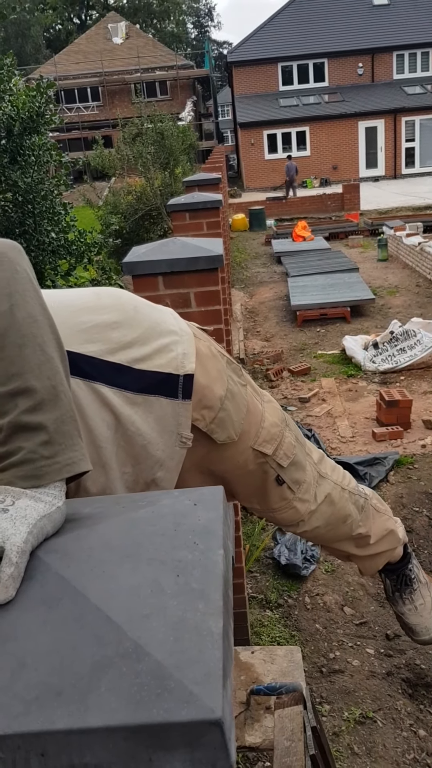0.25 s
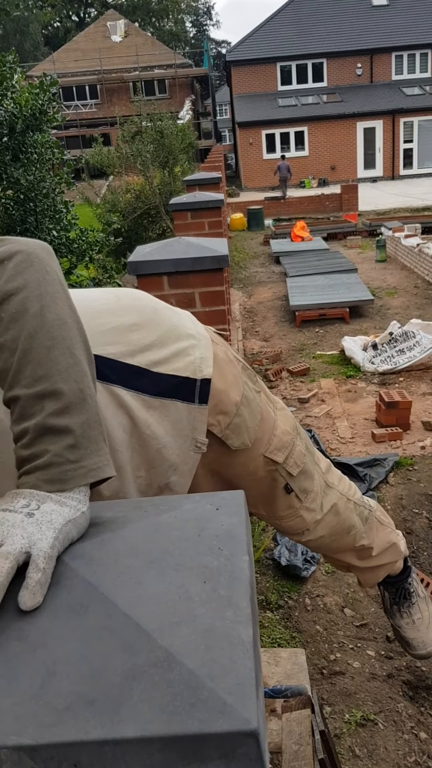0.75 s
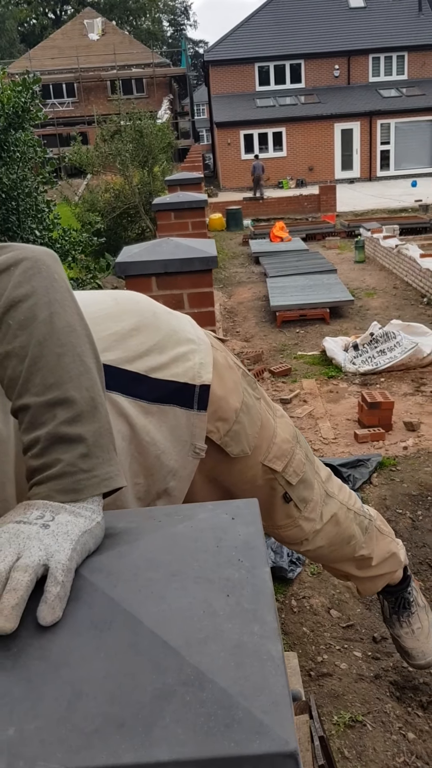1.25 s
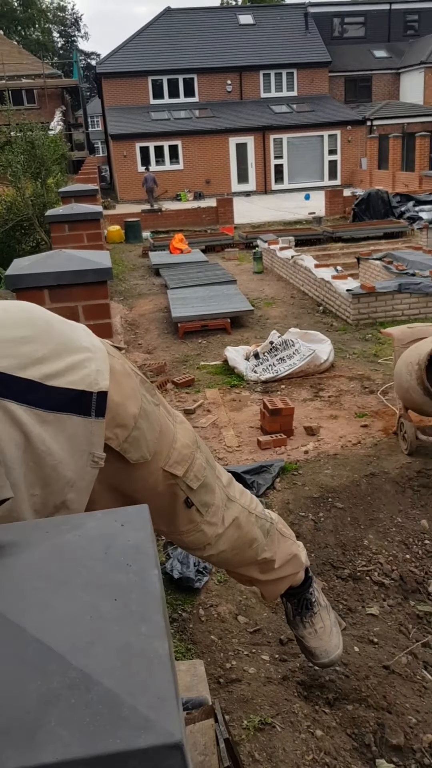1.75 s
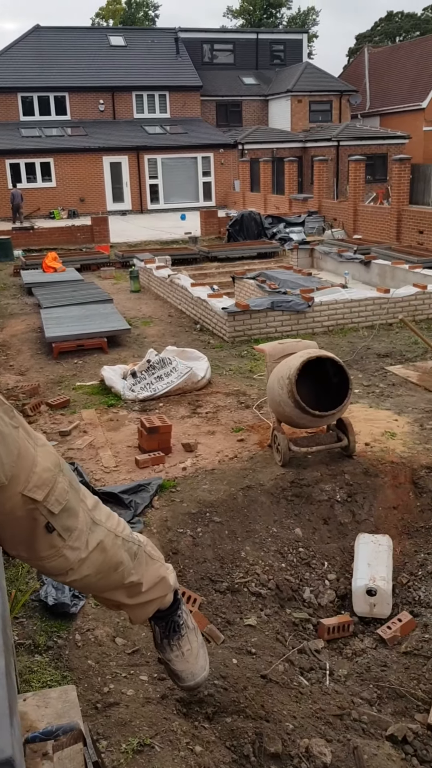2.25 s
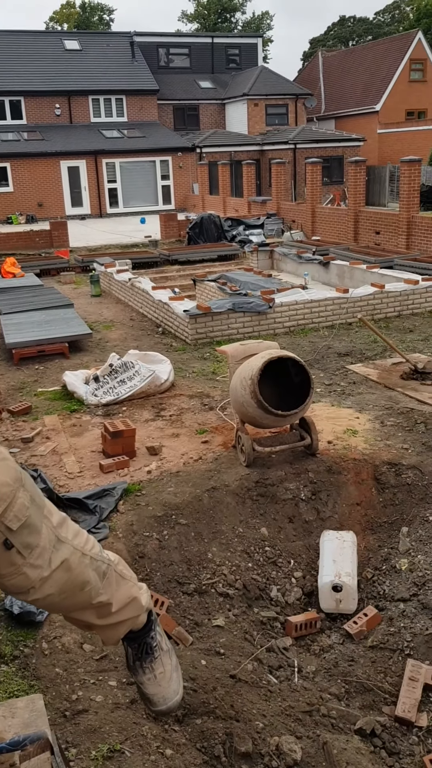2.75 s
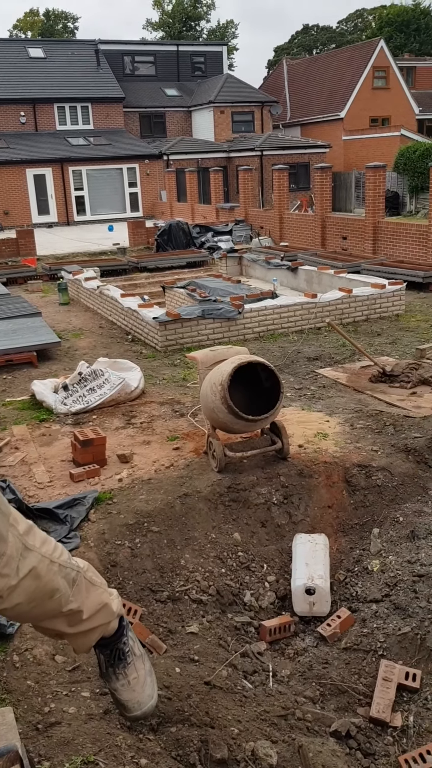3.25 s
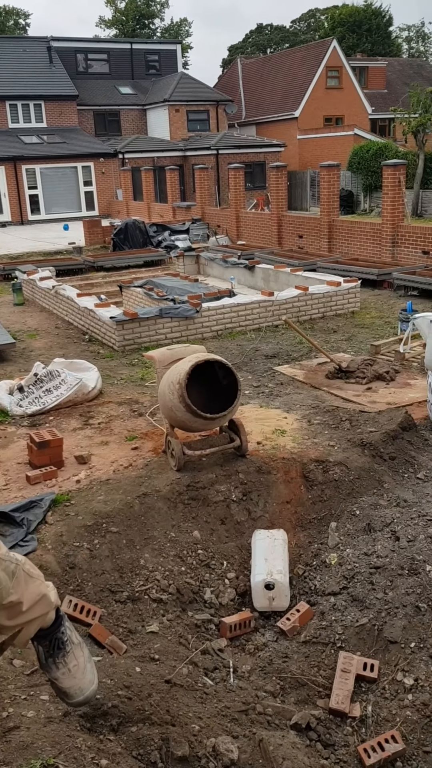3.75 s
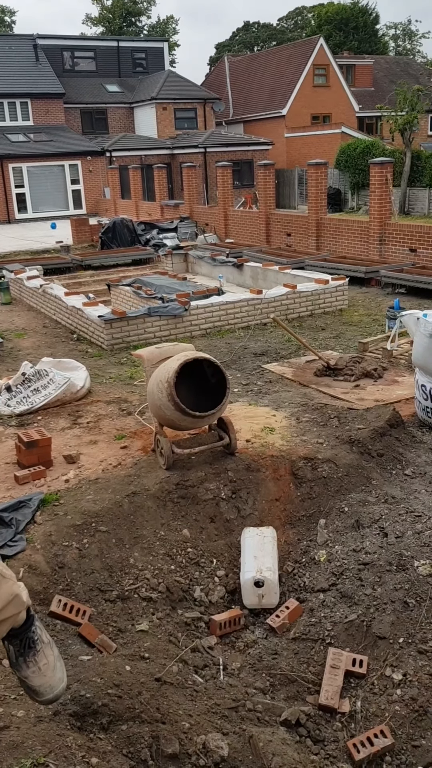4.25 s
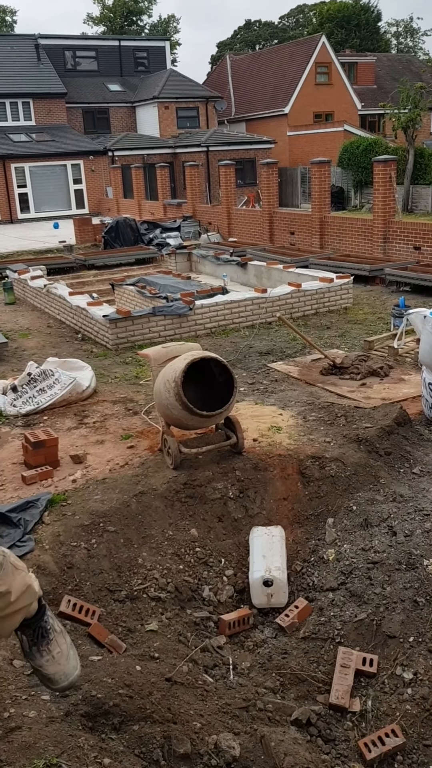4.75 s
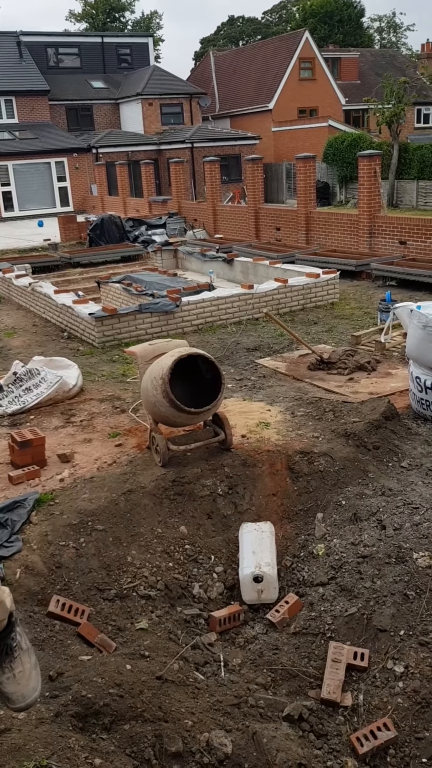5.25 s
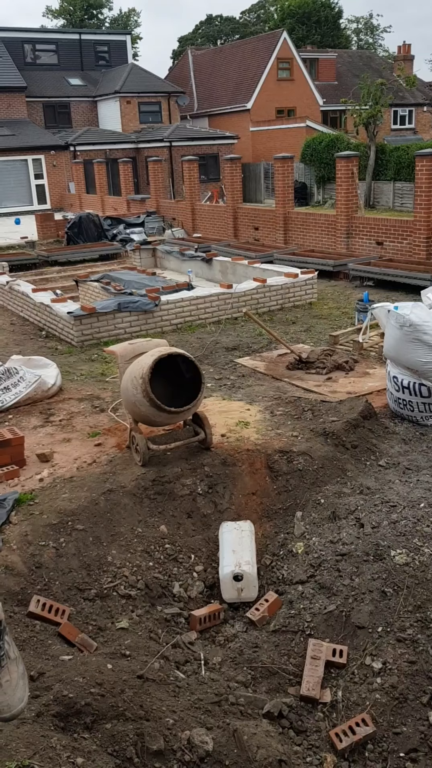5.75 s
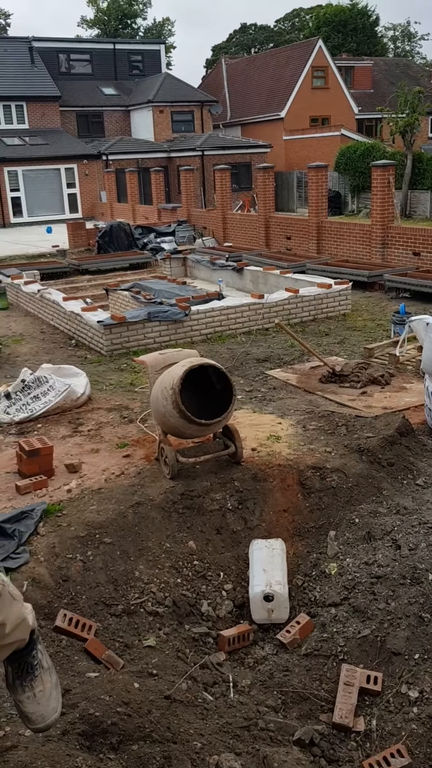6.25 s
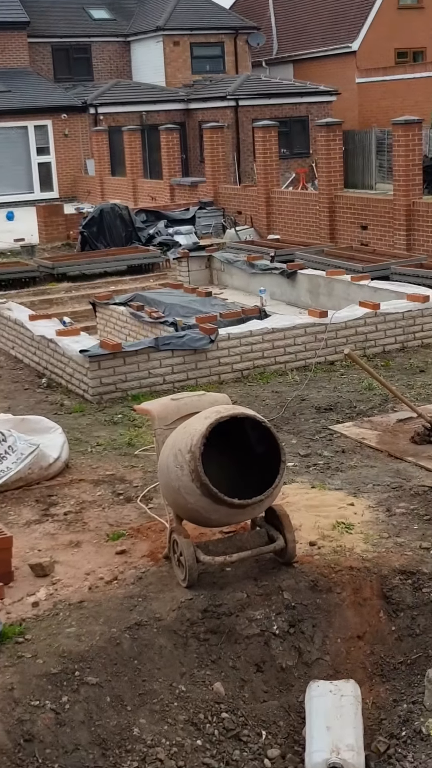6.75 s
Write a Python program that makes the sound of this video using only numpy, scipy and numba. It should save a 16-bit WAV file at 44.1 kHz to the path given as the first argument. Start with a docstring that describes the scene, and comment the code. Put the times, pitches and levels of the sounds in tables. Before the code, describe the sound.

Gritty scrapes and sharp ticks of steel dragging over brick and concrete, with dull mortar thuds, over faint traffic and light wind.

```python
"""Trowel at work under a pillar cap

A bricklayer works mortar close by: a steel trowel drags over brick and concrete. Random grain cracks drive
the sliding contact, the ringing blade and the masonry; ticks, squeaks and a soft rub are added on top.
Wet mortar gives soft thuds of filtered noise, with a few low bumps. Behind lie shaped noise for distant
traffic, leaves, a fading drone and light wind on the microphone, and a few thin gliding bird whistles.
"""
import sys
import numpy as np
from scipy import signal
from scipy.fft import rfft, irfft
from scipy.io import wavfile
from scipy.ndimage import uniform_filter1d
from numba import njit

SR = 44100
rng = np.random.default_rng(int(sys.argv[2]) if len(sys.argv) > 2 else 0)


def put_to_file(sound):
    """Save the sound as 16-bit audio at rate SR, in the file named by the first command-line argument."""
    columns = np.atleast_2d(sound).T  # one column per channel
    safe = np.clip(columns, -1, 1)
    whole_steps = np.round(safe * 32767)
    wavfile.write(sys.argv[1], SR, whole_steps.astype(np.int16))


N = 309141
TIME = np.arange(N) / SR
FREQ = np.maximum(np.arange(N // 2 + 1) * SR / N, 1)

# Decays, fades and creep-ins are exponential time constants; colours are relative levels.
# colour of the far traffic: f/Hz, level/dB
TRAFFIC = [(59, -44), (100, 11.5), (118, 4.5), (214, -6), (313, -3.5), (395, -9.5), (468, -13),
           (1160, -19.5), (1590, -25.5), (2330, -35.5), (3000, -32.5), (3710, -36), (4390, -30),
           (6290, -42.5), (15600, -40.5)]
# level of the far traffic: t/s, level/dB
TRAFFIC_LEVEL = [(0.3, -55.5), (1.6, -58.5), (4.1, -60), (5.6, -62.5), (6.3, -56.5)]
RUMBLE_DB, LEAVES_DB = 3, -72.5  # the low rumble is relative to the traffic
# for a while the low end drops away, then creeps back
LULL_START_S, LULL_END_S, LULL_FALL_S, LULL_RETURN_S = 4.65, 6, 0.14, 0.4
LULL_WIND_DB, LULL_RUMBLE_DB = -15, -12
# colour of the wind on the microphone, ahead of its low and high cuts: f/Hz, level/dB
WIND = [(12, -29), (20, 1), (35, 1), (52, 7.5), (72, -3.5), (112, 1.5), (173, -20.5), (220, -10.5),
        (290, -4), (480, -120)]
# gusts on the microphone: start/s, length/s, level/dB
GUSTS = [(4.18, 0.43, -44.5), (6.355, 0.16, -46), (6.563, 0.052, -41.5), (6.66, 0.4, -48)]
BREEZE_DB = -56
# a far drone holds, then fades to a remnant
DRONE_DB, DRONE_HOLD_S, DRONE_FADE_S, DRONE_REST_DB = -57.5, 0.62, 0.3, -72
# lone grains that snap or drop: t/s, level/dB, f/Hz, width/Hz of each of two equal resonances in a row
TICKS = [(0.271, -54, 5900, 6000), (0.576, -33, 2070, 1590), (0.581, -37, 2090, 1400),
         (0.922, -30, 4200, 7000), (1.19, -52, 8000, 10000), (1.295, -54, 2600, 3000),
         (1.41, -55.5, 5400, 1200), (1.65, -58, 4180, 4000), (2.133, -24, 4300, 1400),
         (2.137, -30, 4400, 1400), (3.831, -46.5, 3200, 1800)]
TICK_DECAY_S = 0.0014
# pushes of the trowel: start/s, length/s, rasp level midway/dB, swell from start to end/dB, creep-in/s,
# then relative to the rasp: blade ring/dB (ahead of the ring lift), sand hiss/dB, masonry/dB,
# contact resonance/dB
STROKES = [(0.587, 0.057, -55.5, 9, .003, -1, -12, 0, -3), (0.636, 0.067, -44, 4.5, .007, -8, -7.5, -7, 7),
           (0.765, 0.081, -48, 5.5, 0.024, -9, -2, -11, 5),
           (0.91, 0.13, -51.5, -9.5, 0.026, -5.5, 0.5, -11, -22),
           (1.886, 0.23, -44, 11.5, 0.021, -7, -4.5, -18.5, 9.5),
           (2.141, 0.12, -42.5, -6.5, 0.014, -1.5, -3.5, -22, -4),
           (2.835, 0.15, -63, -10, 0.011, -20, -4, -3, -3),
           (3.176, 0.17, -60, -7, .002, 1.5, -6.5, 2.5, -12),
           (3.323, 0.14, -69, -14, 0.0054, -16, 5, -3, -7),
           (4.577, 0.074, -51.5, 0, 0.003, -13, -8.5, -8, -12),
           (4.653, 0.13, -73.5, -5, .006, 10, -1, -3, -10),
           (4.81, 0.11, -56, -5.5, 0.0073, -10, -4.5, -1, -17),
           (5.873, 0.089, -53, 8, 0.028, -5, -6.5, -1.5, -10),
           (5.981, 0.0099, -48, -1, .003, -16, -7.5, 0, 1),
           (6.197, 0.082, -61.5, 7.5, 0.021, -18, -7.5, 2.5, 0),
           (6.36, 0.043, -50, 11, 0.029, -0.5, -10, -10, 9),
           (6.428, 0.071, -45.5, 1, 0.0039, -13, -4.5, -13, -8),
           (6.506, 0.13, -47.5, -0.5, 0.016, -4, -4.5, -7.5, 3),
           (6.627, 0.043, -42, -1, 0.0059, -14, -7, -5, 4),
           (6.701, 0.07, -42.5, -6, 0.0097, -13, -2.5, -5, 7.5)]
LIFT_S = 0.019  # the blade lets go
DUST_DB, DUST_S = -16.5, 0.14  # loosened sand runs on after a push
STICK_DB, CHATTER_DB = 1.1, 0.5  # slow and fast unevenness of the drag
# the blade catches or taps, ahead of the trims and ring lift in trowel(): t/s, rasp level/dB,
# then relative to the rasp: blade ring/dB, sand hiss/dB; decay/s
CATCHES = [(0.623, -38.5, -7, -26, .005), (0.639, -35, -13, -13, .005), (0.661, -39, -12, -8, 0.0055),
           (0.695, -39.5, -3, 7.5, 0.0057), (0.704, -56, 16, 4, .012), (0.725, -48, 7.5, 3, .007),
           (0.928, -49, 3, -7, 0.0046), (0.958, -56, 7, -7, 0.0044), (1.826, -36.5, -29, 0.5, 0.01),
           (2.132, -42.5, 11, -11, 0.0054), (2.15, -47, 8, -9, 0.0046), (2.169, -44, 17, -12, 0.0065),
           (2.19, -39, 7, 0, 0.0079), (2.229, -40, 9, 6, 0.0049), (2.804, -45.5, -26, -8, 0.0083),
           (2.901, -48.5, -21, 1, .004), (3.183, -55, 7, -10, .006), (3.313, -41.5, -3.5, -19, 0.007),
           (3.333, -44.5, -24, 2.5, 0.0092), (3.83, -54.5, -26, -2, 0.032), (3.978, -59, -24, 1.5, 0.03),
           (4.569, -46.5, -16, -11, 0.0041), (4.745, -47, -1, -21, .005), (4.8, -51, 5, -1, .006),
           (4.828, -49, 17, -17, 0.008), (4.837, -50.5, 13, -16, 0.0051), (4.865, -39, 8, -17, 0.0034),
           (4.891, -41.5, -5, -21, .007), (5.317, -50, -10, 0, 0.014), (5.94, -36, -7, -5, 0.0041),
           (5.983, -37, -3, -18, 0.0044), (6.275, -46, -6.5, -11, 0.0096), (6.391, -33.5, -8, -22, 0.009),
           (6.431, -30.5, -15, -14, 0.0085), (6.625, -31.5, -14, -12, 0.0036),
           (6.683, -34, -8.5, 3, 0.0059), (6.708, -32, -4.5, 3, 0.0092), (6.736, -30.5, -14, 5, 0.0058),
           (6.76, -24.5, -21, -3, 0.0059), (6.766, -33, -14, 0, 0.0027), (6.788, -29, -22, 8, 0.0031)]
# colour of the rasp: f/Hz, left level/dB, right level/dB
RASP = [(300, -12, -13), (780, -11, -13), (1450, -6.5, -11), (1970, 0.5, -0.5), (2300, 1, -0.5),
        (3300, 2.5, -2.5), (3850, 1.5, 1), (4870, -6, -0.5), (5880, -6.5, -1), (6870, -10, -39),
        (7580, -8.5, -24), (7660, -32, -37), (14800, -43, -29)]
# colour of the sand hiss: f/Hz, left level/dB, right level/dB
HISS = [(3630, -29, -7), (7600, -3.5, 4), (9060, 2.5, -18), (11500, 2, -4), (15400, 1, -14)]
# resonances of the steel blade: f/Hz, width/Hz, level/dB
BLADE = [(2714, 43, -5), (2340, 240, -24.5)]
# resonances of the brick and concrete: f/Hz, width/Hz, level/dB
MASONRY = [(985, 42, 9.5), (1134, 140, 0), (1223, 210, 5), (800, 58, 0)]
# the contact resonance glides as the touching point travels along the blade: t/s, f/Hz
CONTACT_PITCH = [(.63, 3950), (.675, 4400), (.70, 3500), (.78, 3700), (.83, 4400), (1.96, 3720),
                 (2.07, 4130), (2.14, 4600), (6.4, 4200), (6.62, 3950), (6.77, 4330)]
CONTACT_WIDTH_HZ, CONTACT_WANDER = 330, 0.018  # wander is a share of the pitch
# how far the left port lags the right
CONTACT_LAG_S, BLADE_LAG_S = .00022, .000105
BLADE_FLEX_S = .00016  # typical pull of the blade's ring ahead or behind as it flexes
# squeaks of the edge: t/s, f/Hz, level/dB, decay/s
SQUEAKS = [(0.624, 4040, -44, 0.017), (0.7, 3030, -34, 0.012), (0.815, 4370, -40, .005),
           (0.96, 3000, -33, 0.0056), (4.606, 2640, -38, 0.0071), (4.631, 3020, -38.5, 0.016),
           (4.889, 2210, -37, .008), (5.704, 3940, -58, 0.042), (6.391, 4300, -41, 0.013),
           (6.604, 3920, -30, 0.0071)]
SQUEAK_RISE_S, SQUEAK_WANDER = 0.00054, 0.037  # wander is a share of the pitch
# thuds and crunches of mortar: t/s, level/dB, f/Hz, width/Hz of each of two equal resonances in a row,
# swell/s, decay/s
THUDS = [(2.153, -41, 2360, 1000, .003, .016), (2.841, -48.5, 450, 550, 0.002, 0.012),
         (2.901, -48, 450, 650, .001, 0.0078), (3.315, -48.5, 1140, 700, .001, 0.0068),
         (4.575, -54, 1660, 1840, 0.01, 0.082), (4.625, -44, 534, 420, 0.012, 0.018),
         (4.825, -51, 1790, 2000, 0.0051, 0.047), (5.168, -54, 356, 496, 0.012, 0.085),
         (5.314, -51.5, 550, 600, 0.0023, 0.044), (5.82, -57.5, 282, 316, 0.012, 0.46),
         (6.707, -41.5, 1280, 350, 0.00095, 0.0073), (6.759, -40, 1170, 448, .002, 0.014),
         (6.789, -41, 1260, 200, 0.0027, 0.0086)]
# birds: start/s, length/s, first f/Hz, last f/Hz, level/dB, warble as a share of the pitch
BIRDS = [(2.88, .32, 8100, 7700, -76, .018), (3.34, .15, 7950, 7850, -76, .02),
         (5.44, .25, 6500, 5300, -67.5, .045), (6.91, .11, 5100, 5100, -60, .007)]
# low bumps: t/s at the centre, level/dB, f/Hz, Gaussian width/s
BUMPS = [(4.322, -33.5, 75, 0.0057), (4.456, -35.5, 95, .007), (6.594, -24.5, 100, 0.0021),
         (6.758, -35.5, 82, 0.015)]
# colour of the soft rub: f/Hz, left level/dB, right level/dB
SWISH = [(700, -17, -23), (1400, -6, 3), (1860, 4, 5), (2270, -4, -1), (3210, -10, -6), (3960, 1, -1.5),
         (5440, -7, 1.5), (7150, -10, -9), (8200, -6, -32), (11000, -2, -29), (12400, -10, -18),
         (15500, -15, -25)]
SWISH_START_S, SWISH_END_S, SWISH_RISE_S, SWISH_FADE_S, SWISH_DB = 4.85, 5.21, 0.092, 0.48, -64
TOP_HZ = 15900


def undb(db):
    """Turn dB into gain."""
    return 10 ** (np.asarray(db) / 20)


def unit(x):
    """Scale to rms 1."""
    return x / np.sqrt(np.mean(np.abs(x) ** 2))


def colour(points, column=1):
    """Gain against frequency, drawn through a colour table on a log-frequency axis."""
    table = np.array(points)
    return undb(np.interp(np.log(FREQ), np.log(table[:, 0]), table[:, column]))


def stereo_colour(points):
    """One gain curve for the left and one for the right."""
    return np.array([colour(points, column=1), colour(points, column=2)])


def resonances(modes):
    """Response of damped modes that ring after each push."""
    return sum(undb(db) / (1 + 1j * (FREQ / hz - hz / FREQ) * hz / width) for hz, width, db in modes)


def shape(x, response):
    """Filter so that white noise keeps its power."""
    return irfft(rfft(x) * unit(response), N)


def walk(rate):
    """Random levels 1 / rate s apart, joined by straight slopes; spread near 1.2."""
    k = max(int(SR / rate), 1)
    steps = np.repeat(rng.standard_normal(N // k + 1), k)
    return 1.49 * uniform_filter1d(steps, k)[:N]


def stereo_noise(side):
    """White noise with a given side-to-mid ratio."""
    mid, apart = rng.standard_normal((2, N))
    return mid + side * apart * np.array([[1], [-1]])


def delayed(x, lag):
    """Sound that arrives lag seconds later; the lag may move."""
    return np.interp(TIME - lag, TIME, x)


def at_ports(left, right, lag):
    """A source on the right reaches the left port a moment later."""
    return np.array([np.roll(left, round(lag * SR)), right])


def lull():
    """Rises from 0 to 1 while the low end is away."""
    falling = (TIME - LULL_START_S) / LULL_FALL_S
    returning = (LULL_END_S - TIME) / LULL_RETURN_S
    return np.clip(np.minimum(falling, returning), 0, 1)


def outdoors():
    """Far traffic with its low rumble, and leaves: noise split into three bands that sway on their own."""
    traffic_db = np.interp(TIME, *np.transpose(TRAFFIC_LEVEL))
    rumble_db = traffic_db + RUMBLE_DB + LULL_RUMBLE_DB * lull()
    far = colour(TRAFFIC)
    above_rumble, above_traffic = (1 / (1 + (hz / FREQ) ** 4) for hz in (430, 2200))
    rumble_band = far * (1 - above_rumble) / (1 + (130 / FREQ) ** 4)
    rumble = shape(stereo_noise(side=0.045), rumble_band) * undb(rumble_db + walk(7.7))
    traffic = shape(stereo_noise(side=0.44), far * (above_rumble - above_traffic))
    traffic = traffic * undb(traffic_db + 0.24 * walk(3.83))
    leaves = shape(stereo_noise(side=1.0), far * above_traffic) * undb(LEAVES_DB + .7 * walk(3))
    # the road leans a little to the left
    return (rumble + traffic) * undb([[.7], [-.7]]) + leaves


def wind():
    """A light breeze on the microphone: low turbulent noise, with gusts that swell and die."""
    strength = undb(BREEZE_DB + LULL_WIND_DB * lull())
    for start, length, db in GUSTS:
        along = np.clip((TIME - start) / length, 0, 1)
        strength = np.maximum(strength, undb(db) * np.sqrt(np.abs(np.sin(np.pi * along))))
    strength = strength * undb(1.0 * walk(13))
    # strong gusts strike each port on its own
    turbulence = np.clip(strength / undb(-44.0), .55, 1)
    band = colour(WIND) / (1 + (FREQ / 220) ** 4) / (1 + (36 / FREQ) ** 6)
    return strength * shape(stereo_noise(side=turbulence), band)


def drone():
    """A far, noisy drone in one narrow band fades to a remnant."""
    fade = np.exp(-np.maximum(TIME - DRONE_HOLD_S, 0) / DRONE_FADE_S)
    gain = undb(DRONE_DB) * fade + undb(DRONE_REST_DB)
    return gain * shape(stereo_noise(side=0.11), resonances([(325, 84, 0)]) ** 2)


def ticks():
    """Single grains snap under the blade or drop on the cap: one dry click each."""
    out = 0
    for s, db, hz, width in TICKS:
        snap = (TIME >= s) * np.exp(-np.abs(TIME - s) / TICK_DECAY_S)
        click = snap * np.sign(rng.standard_normal(N))
        out = out + undb(db) * shape(click, resonances([(hz, width, 0)]) ** 2)
    return at_ports(out, out, CONTACT_LAG_S)


def grit(rate, spread_db, smooth, scatter):
    """Sand grains crack at random over a fine rub; each throws its sound differently to left and right."""
    size = undb(spread_db * np.minimum(rng.standard_exponential(N), 5))
    cracks = (rng.random(N) < rate / SR) * size * stereo_noise(side=scatter)
    return unit(unit(cracks) + smooth * unit(stereo_noise(side=scatter)))


def push(start, length, swell_db, creep):
    """The blade creeps in, presses harder or softer and lets go; gives its pressure and the running sand."""
    age = TIME - start
    after = np.maximum(age - length, 0)
    swell = undb(swell_db * (np.clip(age / length, 0, 1) - .5))
    held = np.exp(np.minimum(age, 0) / creep) * swell
    return held * np.exp(-after / LIFT_S), held * undb(DUST_DB) * np.exp(-after / DUST_S)


def stroke_pressure():
    """How hard pushes drive rasp, ring, hiss, masonry and contact; loose sand only rasps and hisses."""
    gains = np.zeros((5, N))
    for start, length, db, swell_db, creep, ring, hiss, masonry, contact in STROKES:
        blade, sand = push(start, length, swell_db, creep)
        drive = [
            blade + sand,
            blade * undb(ring),
            (blade + sand) * undb(hiss),
            blade * undb(masonry),
            blade * undb(contact),
        ]
        gains = np.maximum(gains, undb(db) * np.array(drive))
    return gains


def stroke_forces(pressure):
    """The blade sticks and slips as it is dragged over the grains."""
    stick_slip = unit(undb(STICK_DB * walk(120) + CHATTER_DB * walk(600)))
    grains = grit(rate=2400, spread_db=0.74, smooth=0.85, scatter=0.83)
    return np.array(pressure)[:, None] * stick_slip * grains


def catch_forces(rasp_db, ring_db, hiss_db, masonry_db):
    """A coarse grain stops the blade and bursts; its fragments trickle on a little longer."""
    gains = np.zeros((4, N))
    age = TIME[:SR // 8]
    for s, db, ring, hiss, decay in CATCHES:
        burst = np.exp(-age / decay) + 0.078 * np.exp(-age / 0.018)
        levels_db = db + np.array([rasp_db, ring + ring_db, hiss + hiss_db, masonry_db])
        start = int(s * SR)
        gains[:, start:start + len(burst)] += np.outer(undb(levels_db), burst)
    return gains[:, None] * grit(rate=7400, spread_db=3.5, smooth=0.97, scatter=0.86)


@njit
def moving_band(x, hz, width):
    """State-variable band-pass whose centre moves."""
    out, band, low = np.empty(len(x)), 0., 0.
    for i in range(len(x)):
        g = np.tan(np.pi * hz[i] / SR)
        damping = width / hz[i]
        v = (band + g * (x[i] - low)) / (1 + g * (g + damping))
        band = 2 * v - band
        low = low + 2 * g * v
        out[i] = damping * v
    return out


def sliding_rasp(force, pressure, contact):
    """The rasp rings at the gliding contact; a reflection off the cap combs it as the blade travels."""
    hz = np.interp(TIME, *np.transpose(CONTACT_PITCH)) * (1 + CONTACT_WANDER * walk(60))
    share = contact / (pressure + 1e-9)
    rasp = shape(force, stereo_colour(RASP))
    rasp = np.array([side + share * moving_band(side, hz, float(CONTACT_WIDTH_HZ)) for side in rasp])
    reflection_lag = .0021 + 0.00017 * walk(7)
    rasp = rasp + 0.47 * np.array([delayed(side, reflection_lag) for side in rasp])
    # the resonance redistributes the energy rather than adding to it
    return rasp / np.sqrt(1 + 0.75 * share + 0.04 * share ** 2)


def blade_ring(force):
    """The blade rings as one body, in fits, mostly near its main mode; its pitch wavers as it flexes."""
    bite = unit(undb(1.1 * walk(50)))
    radiation = resonances([(3070, 1200, 0)])
    ring = shape(bite * force.mean(axis=0), resonances(BLADE) * radiation)
    ring = delayed(ring, BLADE_FLEX_S * walk(35))
    return at_ports(ring, ring, BLADE_LAG_S)


def trowel():
    """Grain forces sound through the sliding contact, the steel blade and the masonry."""
    *pressure, contact = stroke_pressure()
    catches = catch_forces(rasp_db=-4.0, ring_db=0.5, hiss_db=-7.0, masonry_db=-14.0)
    rasp, ring, hiss, masonry = stroke_forces(pressure) + catches
    hiss = shape(hiss, stereo_colour(HISS))
    masonry = shape(masonry, resonances(MASONRY) * resonances([(1170, 2100, 0)]))
    left, right = sliding_rasp(rasp, pressure[0], contact) + hiss + masonry
    # the ring lift is 4.5 dB
    return at_ports(left, right, CONTACT_LAG_S) + undb(4.5) * blade_ring(ring)


def squeaks():
    """The edge chatters on a hard spot: a short, rough squeak at a pitch of its own."""
    out = np.zeros(N)
    waver = 1 + SQUEAK_WANDER * walk(900)
    age = TIME[:SR // 8]
    for s, hz, db, decay in SQUEAKS:
        start = int(s * SR)
        span = slice(start, start + SR // 8)
        envelope = (1 - np.exp(-age / SQUEAK_RISE_S)) * np.exp(-age / decay)
        phase = 2 * np.pi * hz * np.cumsum(waver[span]) / SR
        out[span] += undb(db) * envelope * np.sin(phase)
    return at_ports(out, out, CONTACT_LAG_S)


def mortar():
    """Wet mortar pressed home gives dull, noisy thuds and crunches."""
    out = 0
    for s, db, hz, width, swell, decay in THUDS:
        age = np.maximum(TIME - s, 0)
        # swells, holds as long again, then dies away
        press = np.minimum(age / swell, 1) * np.exp(-np.maximum(age - 2 * swell, 0) / decay)
        out = out + undb(db) * shape(press * stereo_noise(side=0.38), resonances([(hz, width, 0)]) ** 2)
    return out


def birds():
    """Thin, far whistles that glide down or hold, and warble, with a weak octave."""
    out = 0
    for s, length, first_hz, last_hz, db, warble in BIRDS:
        along = np.clip((TIME - s) / length, 0, 1)
        hz = (first_hz + (last_hz - first_hz) * along) * (1 + warble * walk(1500))
        phase = 2 * np.pi * np.cumsum(hz) / SR
        flutter_db = 2 * walk(60)
        envelope = np.sqrt(np.abs(np.sin(np.pi * along)))
        whistle = np.sin(phase) + 0.13 * np.sin(2 * phase)
        out = out + undb(db + flutter_db) * envelope * whistle
    return out * np.ones((2, 1))


def bumps():
    """Short low bumps: a low cosine inside a bell-shaped swell."""
    out = 0
    for s, db, hz, width in BUMPS:
        age = TIME - s
        out = out + undb(db) * np.exp(-.5 * (age / width) ** 2) * np.cos(2 * np.pi * hz * age)
    return out


def swish():
    """A soft, airy rub, as of a sleeve sliding over the cap: uneven coloured noise."""
    rise = np.minimum(TIME - SWISH_START_S, 0) / SWISH_RISE_S
    fade = np.maximum(TIME - SWISH_END_S, 0) / SWISH_FADE_S
    fibres = unit(stereo_noise(side=1.0)) * undb(0.47 * walk(40))
    return undb(SWISH_DB) * np.exp(rise - fade) * shape(fibres, stereo_colour(SWISH))


def yard(x, t60, wet_db):
    """Ground, pillar and house fronts scatter a short, dull tail."""
    tail = rng.standard_normal((2, N)) * undb(-60 * TIME / t60) * (TIME > .006)
    tail /= np.sqrt(np.sum(tail ** 2, axis=1, keepdims=True))
    tail = shape(tail, 1 / np.hypot(1, FREQ / 7000))[:, :SR // 2]
    return x + undb(wet_db) * signal.fftconvolve(x, tail, axes=1)[:, :N]


def scene():
    """Near work and far birds sound in the yard, over the open-air background."""
    work = ticks() + trowel() + squeaks() + mortar() + swish()
    background = outdoors() + wind() + drone()
    return background + yard(work + birds(), t60=0.25, wet_db=-16.5) + bumps()


def record(dry):
    """The recorder cuts the top with a steep elliptic low-pass."""
    return signal.sosfilt(signal.ellip(10, .2, 70, TOP_HZ, fs=SR, output="sos"), dry)


dry = scene()
out = record(dry)
put_to_file(out)
```